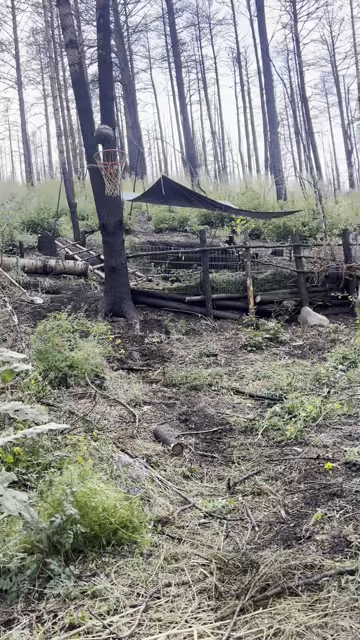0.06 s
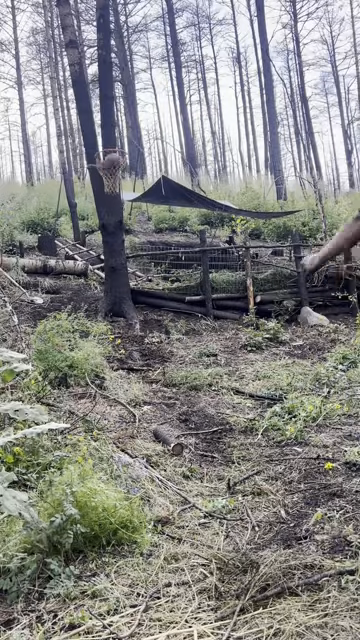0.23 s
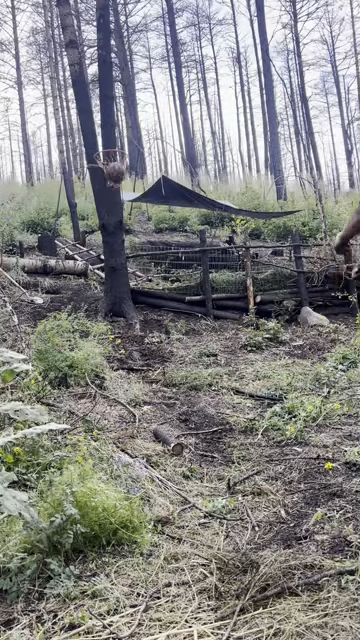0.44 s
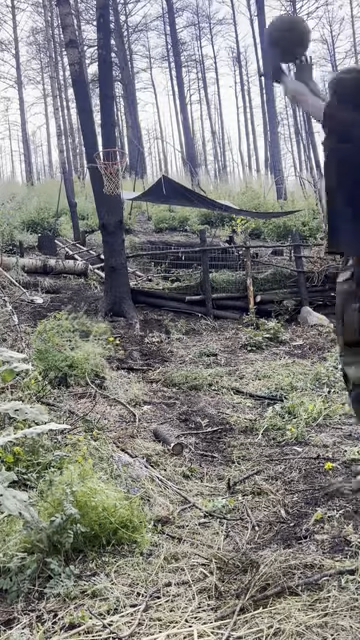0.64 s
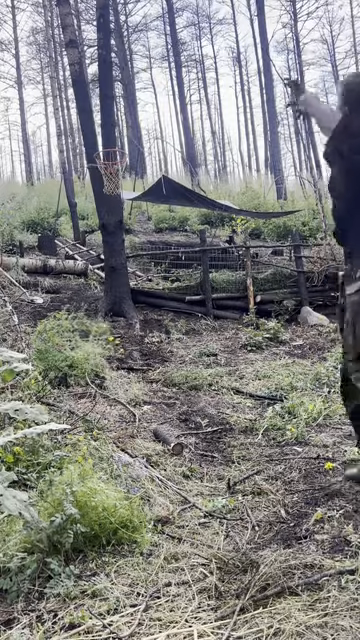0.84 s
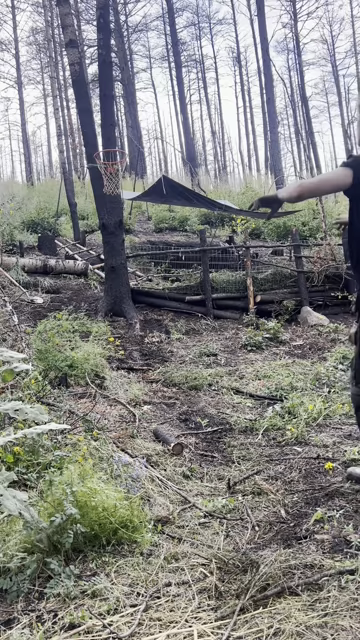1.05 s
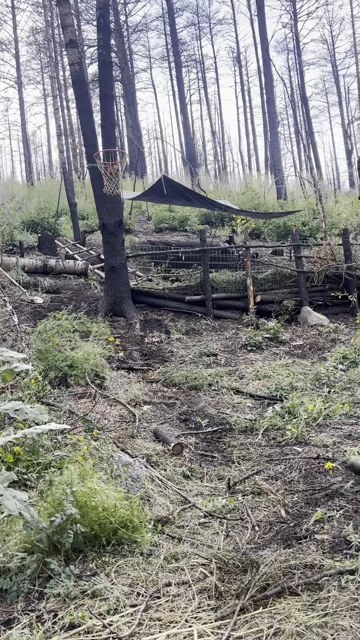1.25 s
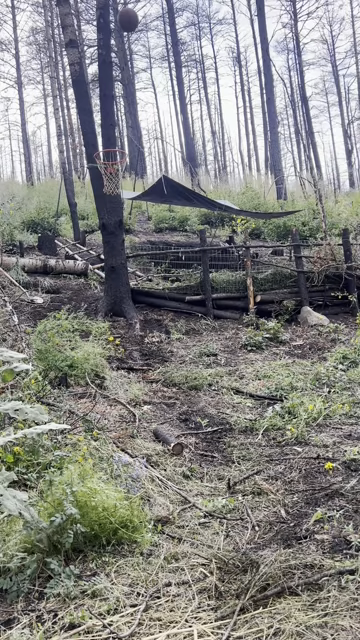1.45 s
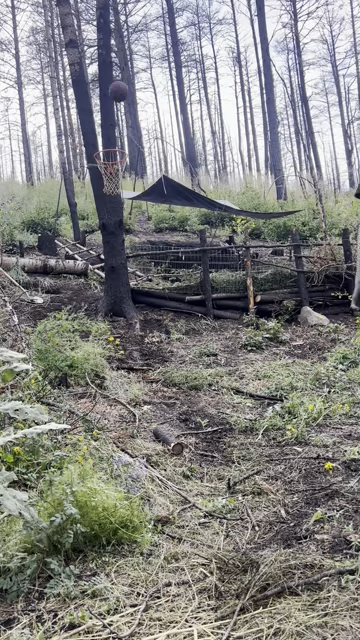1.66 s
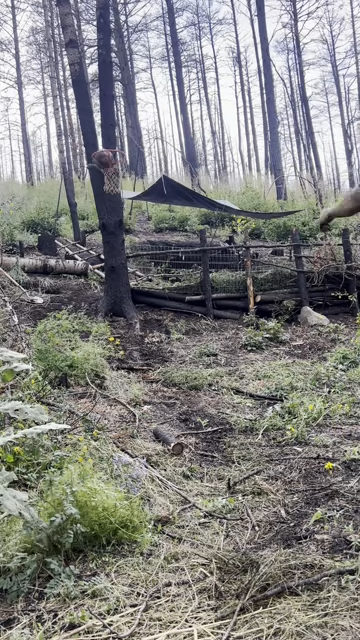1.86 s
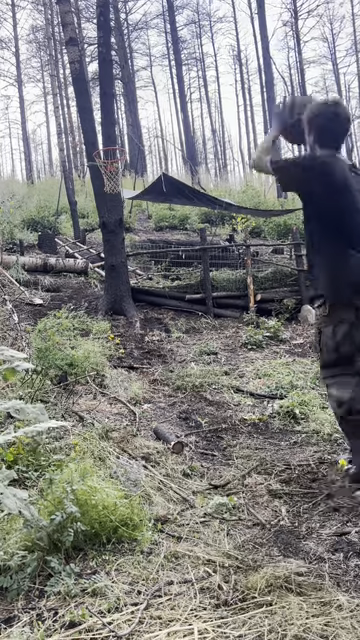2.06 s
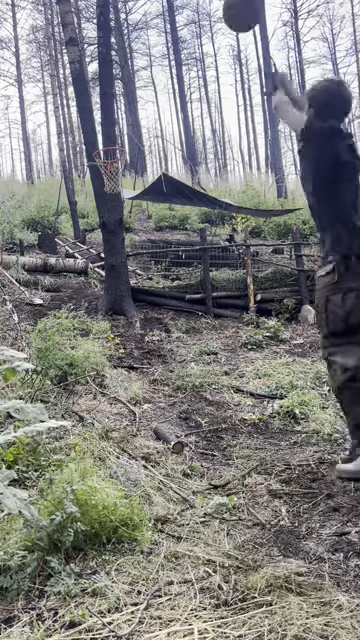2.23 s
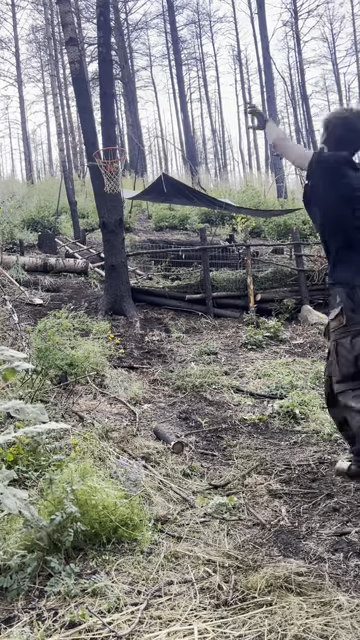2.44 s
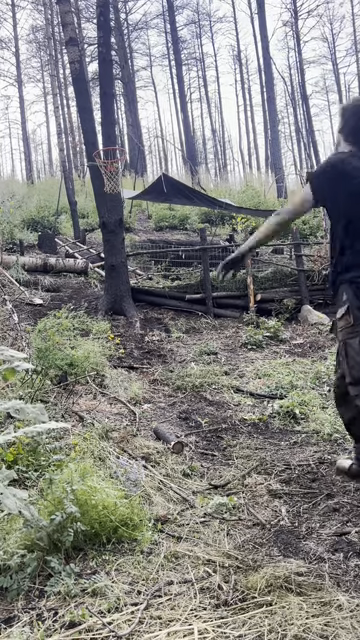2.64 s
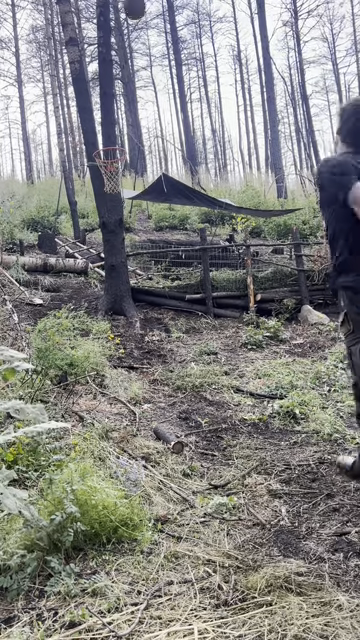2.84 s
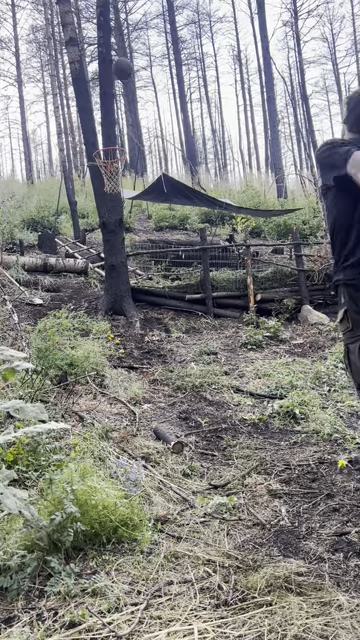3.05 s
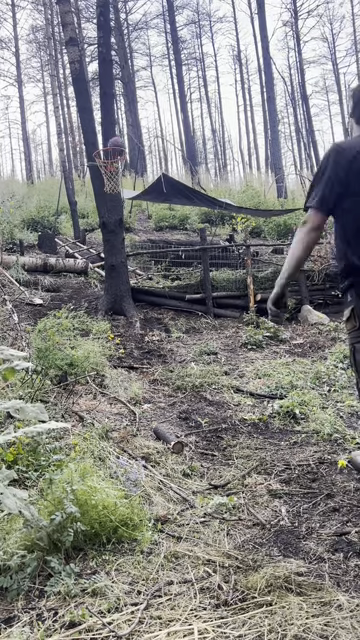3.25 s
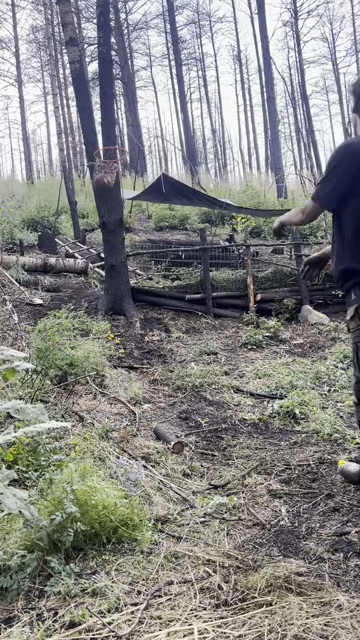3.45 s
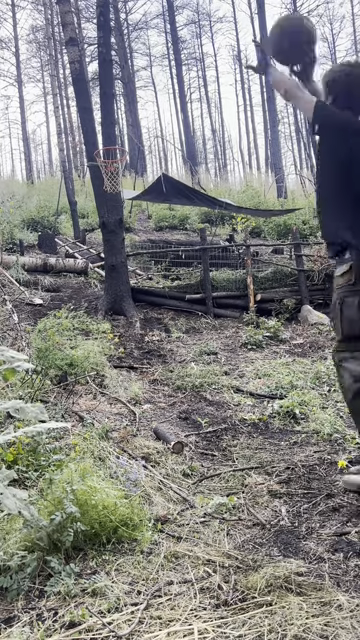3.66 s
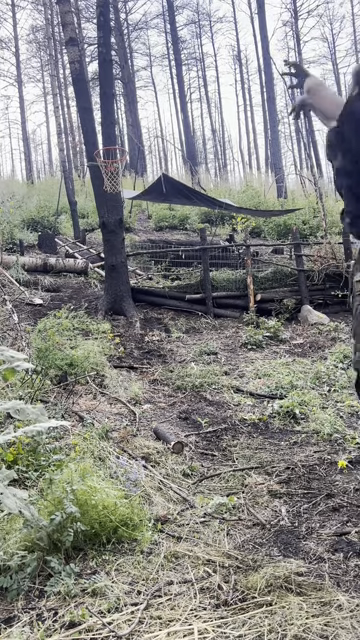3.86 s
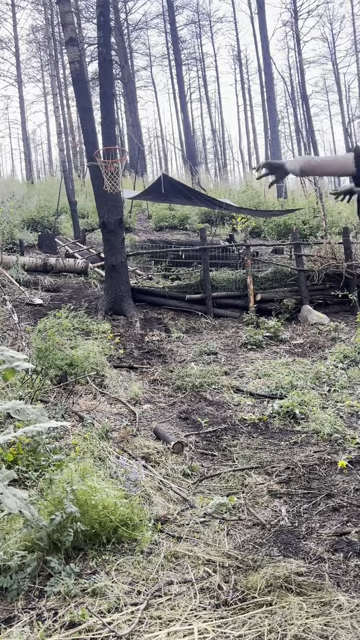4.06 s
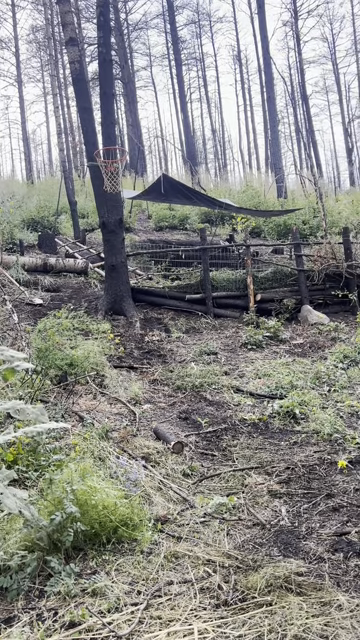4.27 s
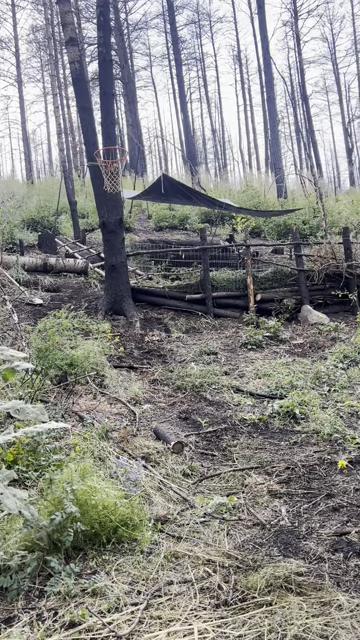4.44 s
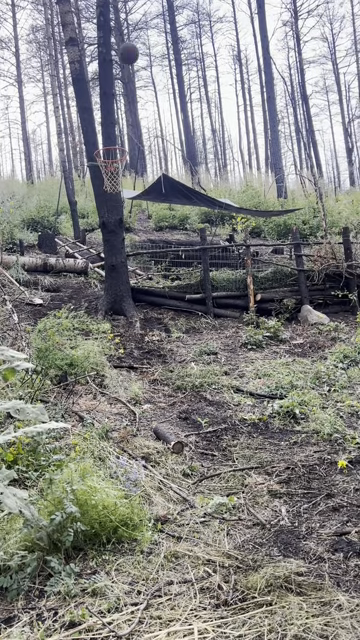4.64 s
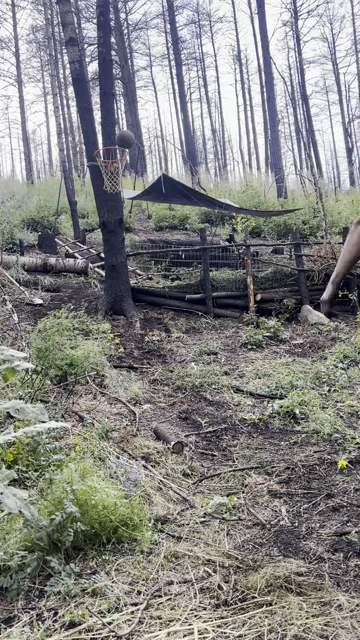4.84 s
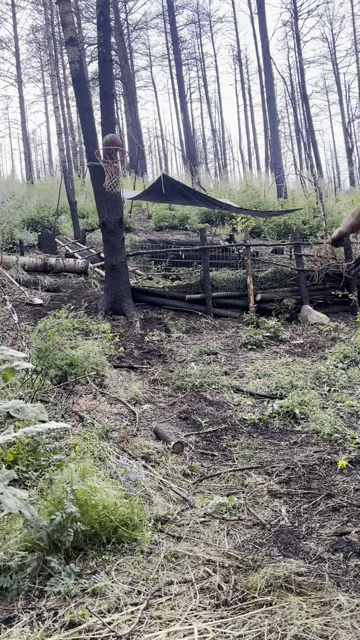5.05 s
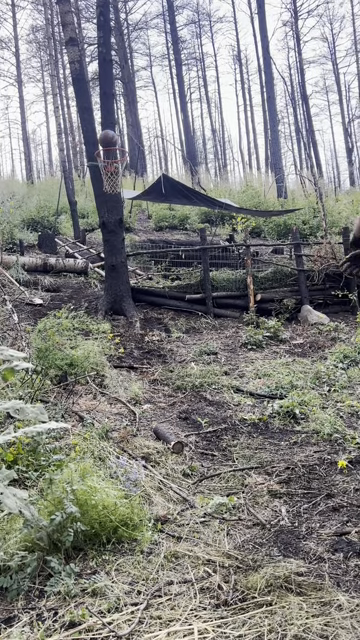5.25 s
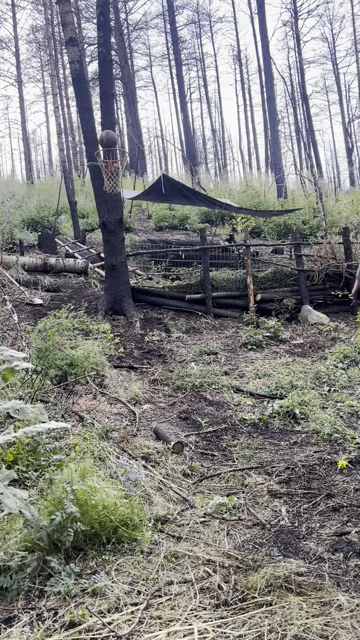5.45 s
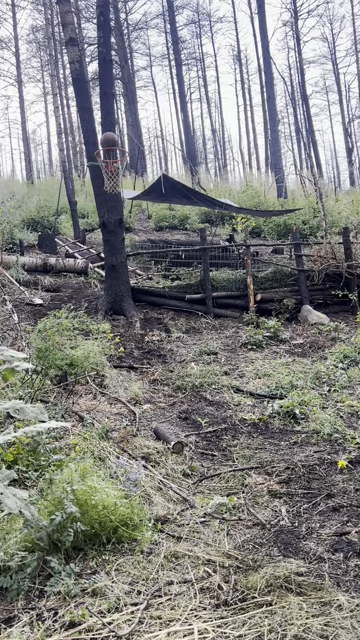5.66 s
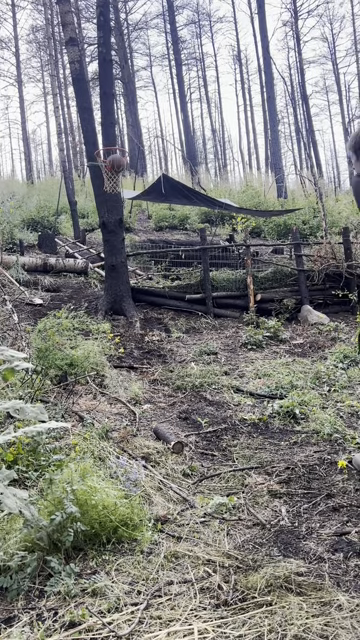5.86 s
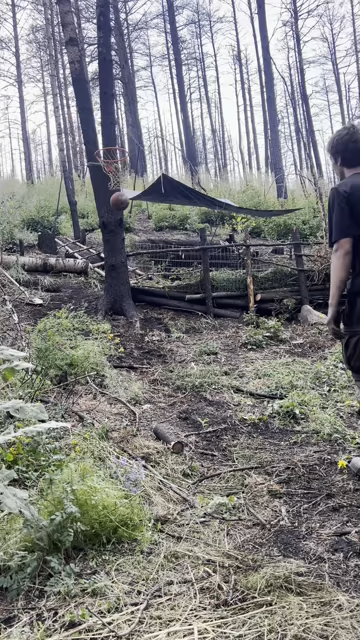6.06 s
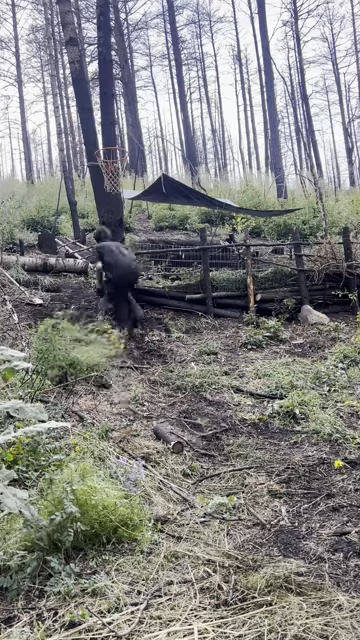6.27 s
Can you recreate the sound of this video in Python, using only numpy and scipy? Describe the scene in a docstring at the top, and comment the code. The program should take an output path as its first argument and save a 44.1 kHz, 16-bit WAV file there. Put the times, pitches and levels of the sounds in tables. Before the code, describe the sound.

Outdoors among trees, a basketball hits a hoop straight away, rattling the rim and thudding against the trunk. Three more shots land about a second and a half apart, the last bouncing on the rim several times. Nearby, the thrower's clothes swish, boots knock on soil and dry twigs snap lightly. Faint forest hiss, distant bird peeps and soft wind rumble on the microphone lie underneath, and a few knocks and a rustle end it.

```python
"""A basketball is thrown four times at a hoop fixed to a tree in a forest clearing. At once the first
throw sets ball and rim ringing in their modes, thuds on the trunk and drags through the net. The others
land near 1.8, 3.3 and 4.9 s; in between, clothes rustle by friction, boots knock on soft ground, twigs
tick, and a far bird peeps near 2.3 and 4 s. Last come a few knocks and a rustle. A faint forest hiss
and a gusty rumble lie under it all, and the level dips briefly three times."""
import sys
import numpy as np
from scipy.fft import rfft, irfft, next_fast_len
from scipy.io import wavfile
from scipy.ndimage import map_coordinates

SR = 44100
rng = np.random.default_rng(int(sys.argv[2]) if len(sys.argv) > 2 else 0)


def put_to_file(sound):
    """Save the sound as 16-bit audio at rate SR, in the file named by the first command-line argument."""
    columns = np.atleast_2d(sound).T  # one column per channel
    safe = np.clip(columns, -1, 1)
    whole_steps = np.round(safe * 32767)
    wavfile.write(sys.argv[1], SR, whole_steps.astype(np.int16))


N = 277906

# left-right coherence of nearby sounds: frequency_hz, coherence
NEAR_COHERENCE = [(60, 1), (300, 0.94), (600, 0.14), (1500, 0.89), (4000, 0.31), (10000, 0.13)]
# breaks in the rustle, the last three with a dip in overall level: start_s, end_s, recovery_s
BREAKS = [(0.618, 0.58, 0.014), (2.01, 2.015, 0.015), (3.588, 3.596, 0.013), (6.113, 6.105, 0.026)]


def ball_on_hoop():
    """Impacts excite damped modes of ball and rim, and shake hoop and net into a rattle."""
    # start_s, level_db, then relative to that level: clank_db, ping_db, skin_db, rattle_db
    blows = [(0.05, -60, 1, -12, 8, 2), (0.095, -45.5, -12, -9, 4, -1), (0.108, -46.5, -17, -12, 5, -3),
             (0.135, -39, -17, -12, 6.5, -1), (0.178, -45, -8, 2, 0, -2), (0.234, -49, -5, -10, -3, -3),
             (0.27, -27.5, 5, 0, -5, -8.5), (0.28, -29.5, 7, -8, -20, -17),
             (0.307, -40.5, -10, -17, -6, -13), (0.359, -46.5, -19, -20, -2, -30),
             (1.761, -36.5, -5, -2, 5, 1.5), (1.771, -36.5, -2, 3, 5.5, -12),
             (1.801, -37.5, -12, 1, -11, -4.5), (1.832, -48, 0, 7.5, 15.5, -9),
             (1.872, -49, -9, 0, -3, 1.5), (1.88, -27, 8, 1, -17, -5), (1.897, -47, 23, 3, 11, -32),
             (1.95, -52.5, -5, -3, 5, -10), (3.25, -47.5, -2, -19, 7.5, -19),
             (3.257, -36, 5, -8.5, -8.5, -6.5), (3.266, -29, 6.5, -13, -18, -20),
             (3.28, -24.5, 8.5, 1, -5, -1), (3.308, -44, -14, -8, 6, -18), (4.826, -42, -6, 2, -8, 8.5),
             (4.836, -43, 3, -12, 1.5, 1.5), (4.873, -28.5, 20, -20, 1, 1), (4.902, -33, 1.5, 3.5, -4, -21),
             (4.965, -48.5, 11, -21, 2, -20), (5.162, -42, 5, -9.5, -13.5, -13),
             (5.171, -49, -1, 7, 5.5, -2), (5.206, -65, -5, -7, 2, 6), (5.403, -55, -4, -10, 3, -10)]
    # groups of modes that each blow excites to its own degree: pitch_hz, level_db, t60_s
    main_modes = [(1036.5, 0.5, 0.045), (1555, -3.5, 0.061), (1225, -7, 0.048), (3097, -10, 0.036),
                  (4550, -15, 0.054), (6520, -16.5, 0.028), (6600, -32.5, 0.035), (7350, -22.5, .04)]
    clank_modes = [(2091, -0.5, 0.024), (2250, -11.5, 0.026)]
    ping_modes = [(2648, 0, .07)]
    skin_modes = [(358, -0.5, 0.075), (457, 3.5, 0.061), (581.2, -7, 0.14)]
    rattle_spectrum = [(350, -10), (600, 0.5), (834, -17), (2160, -9), (2410, -16), (2680, -14),
                       (3310, -19.5), (6500, -14.5), (10000, -24), (16000, -40)]  # frequency_hz, density_db
    hoop_coherence = [(300, 0.72), (2000, 0.9), (8000, 0.35)]  # frequency_hz, coherence
    rattle_t60_s, shake_t60_s, shake_share = 0.041, 0.19, 0.44
    out, shake, t = np.zeros((2, N)), np.zeros(N), np.arange(SR // 3) / SR
    rise = (1 - np.exp(-t / 0.0014)) ** 2  # a soft ball loads the rim over a few milliseconds
    shake_decay = amp(-60 * t / rattle_t60_s) + shake_share * amp(-60 * t / shake_t60_s)
    for start, db, clank_db, ping_db, skin_db, rattle_db in blows:
        tones = ring(main_modes, t, spread_rad=0.31)
        tones += amp(clank_db) * ring(clank_modes, t, spread_rad=0.11)
        tones += amp(ping_db) * ring(ping_modes, t, spread_rad=0.75)
        add(out, start, rise * amp(db) * tones)
        add(out, start + 0.002024, rise * amp(db + skin_db) * ring(skin_modes, t, spread_rad=0.12))
        add(shake, start, rise * amp(db + rattle_db) * shake_decay)
    rattle = shake * noise(rattle_spectrum, hoop_coherence, grain_db=2.0)
    driven_modes = resonate(rattle, main_modes + clank_modes + ping_modes, widen=3.4)
    return out + rattle + amp(4.5) * driven_modes


def knocks():
    """Heavily damped impacts of hands, boots and ball on wood: a low pulse under a slap of noise."""
    contacts = [(0.103, -37, 503, -2, 0.0079), (0.357, -46.5, 133, -13, 0.017),
                (0.772, -56, 144, -14, 0.015), (0.858, -46.5, 210, 0.5, 0.027),
                (0.886, -30.5, 182, -23, 0.0083), (0.896, -35.5, 122, -27, 0.019),
                (2.058, -15.5, 264, -15, 0.0083), (2.072, -37, 303, -28, 0.021),
                (2.112, -34, 350, -28, 0.007), (2.388, -37, 179, -28, 0.023),
                (2.418, -26, 328, -12, 0.0098), (2.424, -30, 198, -14, 0.016),
                (2.46, -30, 297, -17, 0.0044), (2.699, -42, 213, -24, 0.0078),
                (3.351, -34.5, 527, -9.5, 0.044), (3.401, -31.5, 151, -19, 0.019),
                (3.607, -38, 164, -14, 0.016), (3.867, -29.5, 144, -24.5, 0.017),
                (3.899, -32.5, 296, -12, 0.0068), (3.906, -21.5, 363, -19.5, 0.014),
                (3.911, -31, 232, -10.5, 0.021), (3.93, -33, 175, -20, 0.012),
                (3.974, -37.5, 380, -9.5, 0.02), (4.131, -44, 172, -20, 0.01), (4.968, -34, 129, -13, 0.01),
                (5.177, -30.5, 119, -19, 0.019), (5.874, -43.5, 332, -2, 0.0054),
                (6.001, -57.5, 200, -22, 0.015), (6.131, -42.5, 189, -2, 0.0084),
                (6.16, -44.5, 122, -3.5, 0.017), (6.243, -46, 133, 0.5, 0.022)]  # start_s, level_db, pitch_hz, relative_slap_db, length_s
    slap_spectrum = [(300, -31), (600, -1), (1500, -8.5), (2500, -16.5), (5000, -38), (16000, -45)]  # frequency_hz, density_db
    out, slap, t = np.zeros((2, N)), np.zeros(N), np.arange(SR // 5) / SR
    rise = 1 - np.exp(-t / 0.001)
    for start, db, hz, slap_db, length in contacts:
        add(out, start - .002, amp(db) * wavelet(hz, length, sag=0.081, spread_rad=0.23))
        add(slap, start - .002, rise * amp(db + slap_db - 60 * t / (2.73 * length)))
    return out + slap * noise(slap_spectrum, NEAR_COHERENCE, grain_db=3.0)


def thuds():
    """Soil and trunk act as low-pass filters: an impact comes through as a slow pulse."""
    impacts = [(0.01, -44, 69.5, 0.04), (0.152, -36, 80.5, 0.039), (0.101, -34, 125, 0.036),
               (0.209, -33.5, 138.6, 0.066), (0.409, -36.5, 56.5, 0.043), (0.845, -42.5, 66, 0.1),
               (1.78, -22, 104, 0.023), (1.85, -28.5, 92, 0.032), (2.467, -34.5, 65.4, 0.03),
               (2.562, -26.5, 72.5, 0.016), (2.615, -26, 59.6, 0.055), (2.769, -36, 63, 0.038),
               (2.879, -43.5, 57.7, 0.069), (3.077, -48.5, 52.4, 0.088), (3.267, -39, 116, 0.14),
               (3.354, -29.5, 59.5, 0.048), (3.419, -21.5, 60, 0.046), (3.467, -26.5, 75, 0.044),
               (3.522, -33, 74, 0.02), (3.837, -48.5, 107, 0.029), (3.994, -41, 64.6, 0.04),
               (4.24, -43, 71, 0.038), (4.461, -45.5, 87, 0.065), (4.841, -34, 128.5, 0.045),
               (4.875, -34, 126, 0.059), (4.974, -34, 112, 0.033), (5.177, -38, 120, 0.066),
               (5.43, -48, 108, 0.047)]  # start_s, level_db, pitch_hz, length_s
    out = np.zeros((2, N))
    for start, db, hz, length in impacts:
        add(out, start - .006, amp(db) * wavelet(hz, length, sag=0.12, spread_rad=0.24))
    return out


def brushing():
    """Friction of cloth, net and undergrowth: strokes of noise swell and fade over a constant stir."""
    strokes = [(0.0, 0.3, -56, -50.5), (0.179, 0.13, -62, -49), (0.526, 0.52, -63.5, -67.5),
               (0.766, 0.016, -66, -54), (0.781, 0.24, -63, -55.5), (0.854, 0.062, -62, -59),
               (0.985, 0.14, -80, -65.5), (1.066, 0.013, -62, -70), (1.277, 0.082, -71.5, -85),
               (1.4, 0.019, -71.5, -81), (1.522, 0.036, -71.5, -74), (1.746, 0.19, -56.5, -48),
               (1.874, 0.11, -81, -59.5), (2.023, 0.16, -66.5, -52), (2.138, 0.042, -65, -71),
               (2.251, 0.0067, -80, -70), (2.352, 0.12, -62, -50.5), (2.404, 0.026, -50, -52),
               (2.437, 0.17, -89, -63), (3.219, 0.012, -75, -80), (3.27, 0.12, -57.5, -51),
               (3.593, 0.093, -64, -54), (3.845, 0.11, -59.5, -51.5), (3.881, .03, -64, -56),
               (3.895, 0.024, -45.5, -35), (3.944, 0.048, -69, -53), (3.955, .2, -83, -57),
               (4.093, .05, -72.5, -74), (4.506, 0.22, -92, -70.5), (4.895, 0.098, -64.5, -54.5),
               (5.16, 0.062, -73, -59), (5.347, 0.11, -72.5, -66.5), (5.82, 0.084, -77.5, -73),
               (5.498, 0.41, -77.5, -92), (5.893, 0.031, -73, -73), (5.915, 0.044, -74.5, -64),
               (6.112, 0.15, -61, -58), (6.14, 0.055, -54, -61), (6.194, 0.051, -61.5, -75),
               (6.248, .03, -67, -59)]  # start_s, length_s, rustle_db, scuff_db
    stir = [(-92.5, -70, -64), (-82.5, -71.5, -70.5), (-85.5, -71, -75), (-82, -72, -81),
            (-63.5, -70.5, -60.5)]  # one row per stretch between breaks: rustle_db, crunch_db, scuff_db
    # fine rustle, crunch of dry twigs and coarse scuff: frequency_hz, density_db
    rustle_spectrum = [(590, -54), (1000, 2.5), (1100, -7.5), (3540, -10), (8750, -11), (9940, -25),
                       (10800, -21), (14200, -24), (16000, -46)]
    crunch_spectrum = [(400, -15), (800, -3.5), (1500, -0.5), (2250, -7), (2700, -20), (4000, -50)]
    scuff_spectrum = [(80, -3), (150, 4), (400, 1), (800, -6.5), (1500, -47.5)]
    break_times = [row[0] for row in BREAKS]
    stretch = np.searchsorted(break_times, np.arange(N) / SR)
    levels = amp(stir)[stretch].T
    for start, length, rustle_db, scuff_db in strokes:
        next_break = min([s for s in break_times if s > start] + [N / SR])
        progress = np.arange(round(min(3 * length, next_break - start) * SR)) / SR / length
        crunch_db = (rustle_db + scuff_db) / 2 - 7.5
        add(levels, start, amp([[rustle_db], [crunch_db], [scuff_db]]) * swell(progress))
    rustle = amp(1.27 * wobble(40)) * noise(rustle_spectrum, NEAR_COHERENCE, grain_db=1.5)
    crunch = amp(1.6 * wobble(50)) * noise(crunch_spectrum, NEAR_COHERENCE, grain_db=1.0)
    scuff = amp(3.98 * wobble(40)) * noise(scuff_spectrum, NEAR_COHERENCE, grain_db=1.5)
    return levels[0] * rustle + levels[1] * crunch + levels[2] * scuff


def ticks():
    """Twigs and seams snap in broadband transients: a puff of noise and one fast-decaying mode."""
    snaps = [(0.7704, -43.5, 7600), (0.855, -51.5, 2590), (0.8903, -47, 4220), (0.9144, -47, 6560),
             (1.0685, -53, 5540), (1.5485, -45, 7700), (2.2553, -54.5, 3270), (2.348, -43, 2430),
             (3.2237, -49, 6100), (3.705, -50.5, 3230), (3.8305, -59, 2560), (5.8306, -51.5, 7870),
             (5.8674, -63, 2590)]  # start_s, level_db, pitch_hz
    out, t = np.zeros((2, N)), np.arange(SR // 20) / SR
    for start, db, hz in snaps:
        puff = 0.42 * amp(-60 * t / 0.0091) * np.diff(rng.standard_normal((2, len(t) + 1)))
        add(out, start, amp(db) * (ring([(hz, 0, .004)], t, spread_rad=0.47) + puff))
    return out


def bird():
    """Falling sine glides flutter among the trunks; a phase difference sets them to one side."""
    peeps = [(2.278, 2.31, 2630, 2480, -63), (3.78, 3.804, 2600, 2580, -69),
             (4.163, 4.263, 2400, 2360, -72), (4.204, 4.296, 3620, 3070, -77),
             (4.185, 4.27, 1820, 1600, -68), (4.237, 4.334, 4050, 3700, -79)]  # start_s, end_s, from_hz, to_hz, level_db
    out = np.zeros((2, N))
    for start, end, from_hz, to_hz, db in peeps:
        count = round((end - start) * SR)
        angle = 2 * np.pi * np.cumsum(np.linspace(from_hz, to_hz, count)) / SR
        add(out, start, amp(db) * np.hanning(count) * np.sin([angle + 0.38, angle - .8]))
    return out * amp(5 * wobble(160))


def air():
    """Amplitude-modulated noise: far forest hiss, and a rumble of wind and handling on the microphone."""
    hiss_spectrum = [(59, -63), (100, -5), (129, -11.5), (315, -2.5), (452, -5), (524, -3), (595, 0.5),
                     (736, -3.5), (970, -10), (2250, -9), (2600, -24), (7770, -26), (16000, -23.5)]  # frequency_hz, density_db
    hiss_coherence = [(60, 0.84), (180, 0.32), (550, 0.074), (1650, 1), (4970, 0.11), (15000, 0.2)]  # frequency_hz, coherence
    rumble_spectrum = [(20, -40), (40, -9), (60, 0), (110, -5), (200, -22), (400, -50)]  # frequency_hz, density_db
    rumble_course = [(0.0, -58.5), (0.24, -41), (0.39, -67), (0.98, -58.5), (1.37, -75), (1.65, -75),
                     (1.77, -57.5), (2.51, -51), (3.03, -69), (3.4, -48.5), (3.5, -55), (3.8, -72),
                     (4.02, -57.5), (4.76, -67), (4.88, -54.5), (5.05, -66), (5.54, -73.5), (6.07, -94),
                     (6.16, -45.5), (6.3, -66)]  # time_s, level_db
    hiss_db, drift_db, gust_db = -72.5, 3.9, 4
    hiss = amp(hiss_db + drift_db * wobble(6)) * noise(hiss_spectrum, hiss_coherence)
    rumble_db = np.interp(np.arange(N) / SR, *np.transpose(rumble_course)) + gust_db * wobble(25)
    return hiss + amp(rumble_db) * noise(rumble_spectrum, coherence=[(60, 0.77)])


def ring(modes, t, spread_rad):
    """Free vibration: decaying sines whose strength, tuning and stereo phase vary from blow to blow."""
    hz, db, t60 = np.transpose(modes)[:, :, None]
    strength, detune, lead = rng.standard_normal((3, len(modes), 1))
    decay = amp(db + 2.5 * strength - 60 * t / t60)
    angle = 2 * np.pi * hz * (1 + .006 * detune) * t
    return np.array([(decay * np.sin(angle + side * spread_rad * lead)).sum(axis=0) for side in (1, -1)])


def resonate(x, modes, widen):
    """Forced vibration: x drives resonances of bandwidth widen / t60."""
    def peak(f, hz, db, t60):
        damping = 1j * f * widen / t60
        return amp(db) * damping / (hz * hz - f * f + damping)
    return filtered(x, lambda f: sum(peak(f, *mode) for mode in modes))


def wavelet(hz, length, sag, spread_rad):
    """A contact pulse: a few cycles swell, fade and sag in pitch as the contact lets go."""
    progress = np.arange(round(3 * length * SR)) / SR / length
    angle = 2 * np.pi * hz * length * (progress + sag * (1 - np.exp(-3 * progress)) / 3)
    lead = spread_rad * rng.standard_normal()
    return swell(progress) ** 2 * np.sin([angle + lead, angle - lead])


def swell(progress):
    """Linear growth times exponential decay, peaking at 1 when progress is 1/3."""
    return 3 * progress * np.exp(1 - 3 * progress)


def noise(spectrum, coherence, grain_db=0):
    """Stereo noise of rms 1: mid-side balance sets its coherence, fast modulation its crackle."""
    def response(hz):
        turn = np.arccos(np.clip(along(coherence, hz), -1, 1)) / 2
        return amp(along(spectrum, hz)) * [np.cos(turn), np.sin(turn)]
    grains = rng.standard_normal((2, N)) * amp(grain_db * wobble(700))
    mid, side = filtered(grains, response)
    stereo = np.array([mid + side, mid - side])
    return stereo / np.sqrt(np.mean(stereo ** 2) + 1e-20)


def wobble(rate_hz):
    """Smooth random modulation: a spline through rate_hz knots a second."""
    knots = rng.standard_normal(int(N * rate_hz / SR) + 4)
    return map_coordinates(knots, [np.arange(N) * rate_hz / SR])


def filtered(x, response):
    """Linear filtering: the spectrum of x times a frequency response."""
    size = next_fast_len(N + 8192)
    return irfft(rfft(x, size) * response(np.fft.rfftfreq(size, 1 / SR)), size)[..., :N]


def along(points, hz):
    """Interpolation of (frequency_hz, value) points on a log frequency axis."""
    frequencies, values = np.transpose(points)
    return np.interp(np.log(hz + 1), np.log(frequencies + 1), values)


def amp(db):
    """Amplitude ratio of a level in dB."""
    return 10 ** (np.asarray(db) / 20)


def add(track, start_s, sound):
    """Superpose a sound on a track from start_s."""
    part = track[..., round(start_s * SR):][..., :sound.shape[-1]]
    part += sound[..., :part.shape[-1]]


def scene():
    """Superposition: the pressures of all sources add."""
    return ball_on_hoop() + knocks() + thuds() + ticks() + brushing() + bird() + air()


def record(dry):
    """The level dips briefly three times; the microphone, a low-pass filter, dulls the top."""
    mic_response = [(9900, -1), (10500, -10), (11500, -18), (13000, -17), (14000, -11), (16000, -13)]  # frequency_hz, gain_db
    cutoff_hz = 15900
    t, gain = np.arange(N) / SR, np.ones(N)
    for start, end, recovery in BREAKS:
        gain *= np.interp(t, [start - .002, start, end, end + recovery], [1, .05, .05, 1])
    return filtered(dry * gain, lambda hz: amp(along(mic_response, hz)) * (hz < cutoff_hz))


dry = scene()
out = record(dry)
put_to_file(out)
```